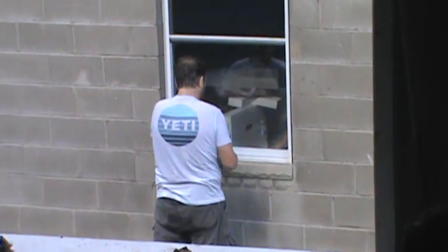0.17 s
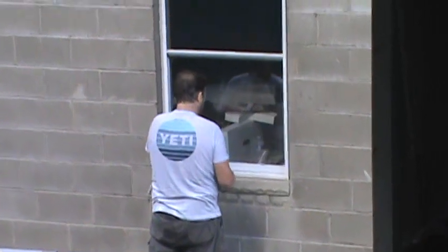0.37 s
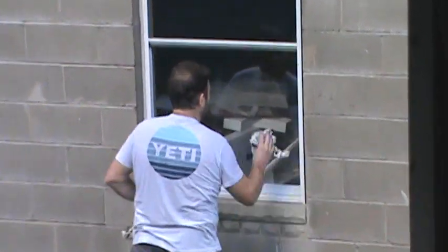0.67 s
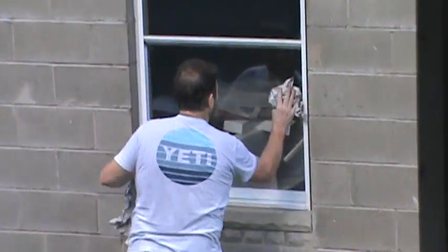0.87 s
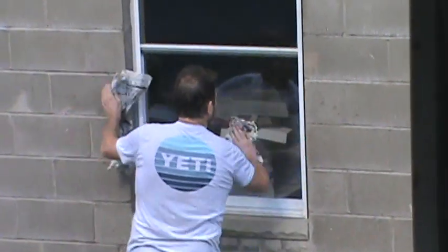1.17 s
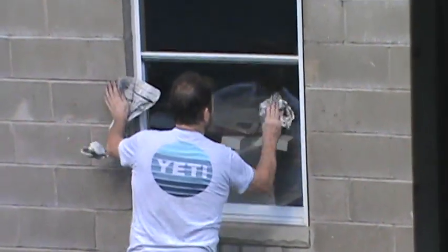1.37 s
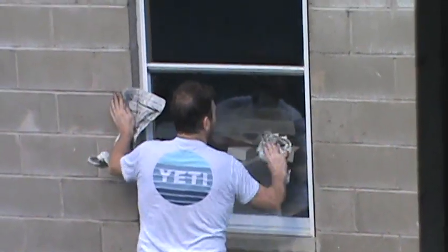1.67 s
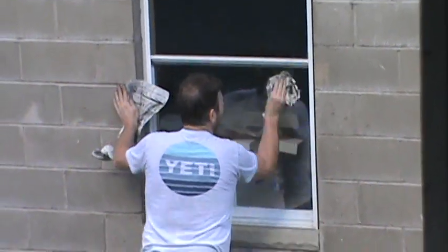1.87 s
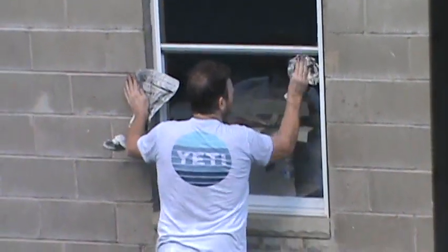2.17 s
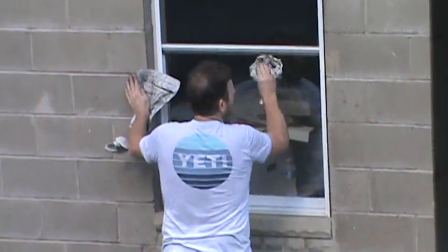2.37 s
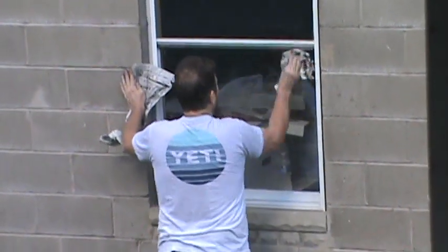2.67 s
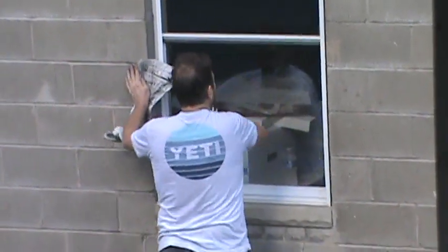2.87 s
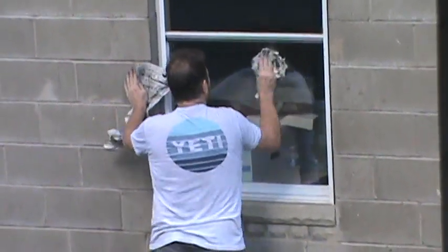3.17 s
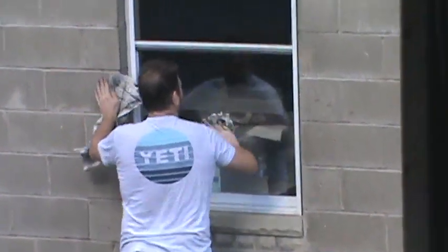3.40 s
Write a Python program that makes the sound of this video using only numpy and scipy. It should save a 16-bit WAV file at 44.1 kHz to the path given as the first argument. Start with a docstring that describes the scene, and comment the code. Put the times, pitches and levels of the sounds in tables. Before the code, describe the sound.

Crumpled newspaper wipes window glass outdoors, at a distance: faint swishes at first, raspier strokes and creasing crackles around 0.9-1.5 s, then brisk bright swishes from 2.1 to 3.0 s and a last rub near 3.4 s. Tiny squeaks come near 1.9 and 2.3 s. Close camera clicks and knocks dominate 0.3-0.9 s with a thin whine; faint focus pips follow. Low rumble, drone and hiss persist.

```python
"""Outdoors, some way off, a man wipes a window with a wad of crumpled newspaper.
Shaped noise makes the swishes, rasps and crackles; short gliding tones make the small squeaks.
Close by, a camera's zoom control ticks (decaying tones and noise), its zoom motor whines for half a second
and its focus motor pips (wavering tones).
Behind lie a dull rumble and a machine drone, with a low hum, and the camera's own hiss and whistle."""
import sys
import numpy as np
from scipy import signal
from scipy.fft import rfft, irfft, next_fast_len
from scipy.io import wavfile
from scipy.ndimage import uniform_filter1d, map_coordinates

SR = 44100
rng = np.random.default_rng(int(sys.argv[2]) if len(sys.argv) > 2 else 0)


def dump_mix(stems):
    """Bounce the given channels to the path in sys.argv[1] as a 16-bit WAV at rate SR."""
    frames = np.atleast_2d(stems).T  # one column per channel
    limited = np.clip(frames, -1, 1)  # hard clip at full scale
    pcm = np.round(limited * 32767).astype(np.int16)
    wavfile.write(sys.argv[1], SR, pcm)


N = 156114  # length in samples, about 3.54 s


def amp(db):
    """Turn decibels into gain."""
    return 10 ** (np.asarray(db) / 20)


def unit(x):
    """Scale x to an rms (average strength) of 1."""
    return x / np.sqrt(np.mean(x ** 2) + 1e-20)


def clock():
    """Give the time of each sample in seconds."""
    return np.arange(N) / SR


def along(points, hz):
    """Read a curve of (pitch_hz, value) points on a logarithmic pitch axis."""
    point_hz, value = np.transpose(points)
    return np.interp(np.log(hz + 1), np.log(point_hz + 1), value)


def curve(rows):
    """Join (time_s, value) points by straight lines, one value per sample."""
    return np.interp(clock(), *np.transpose(rows))


def wobble(rate):
    """Draw a smooth random curve through `rate` random points a second."""
    return map_coordinates(rng.standard_normal(N // 8), [clock() * rate + 2], mode="wrap")


def white():
    """Make two unrelated white noises."""
    return rng.standard_normal((2, N))


def tone(hz):
    """Make a sine of rms 1 that follows a pitch curve."""
    return np.sqrt(2) * np.sin(2 * np.pi * np.cumsum(hz) / SR)


def gate(start, end, rise, fall):
    """Rise smoothly from the start and fall smoothly to the end (all in seconds)."""
    t = clock()
    opening = np.sin(np.pi / 2 * np.clip((t - start) / rise, 0, 1))
    closing = np.sin(np.pi / 2 * np.clip((end - t) / fall, 0, 1))
    return opening * closing


def bursts(times, levels_db, t60):
    """Make noise that jumps up at each time and fades by 60 dB in t60 seconds."""
    t = clock()
    envelope = sum((t >= start) * amp(db - 60 * np.abs(t - start) / t60) for start, db in zip(times, levels_db))
    return white() * envelope


def filtered(x, response):
    """Multiply the spectrum of x by a response that depends on pitch."""
    m = next_fast_len(N + SR // 4)  # spare room at the end
    return irfft(rfft(x, m) * response(np.fft.rfftfreq(m, 1 / SR)), m)[..., :N]


def coloured(pair, spectrum, alike):
    """Mix two unrelated noises into left and right with one spectrum shape, at the same power."""
    def response(hz):
        # a small turn makes left and right alike, a large one makes them differ
        turn = np.arccos(np.clip(along(alike, hz), -.999, .999)) / 2
        return unit(amp(along(spectrum, hz))) * np.array([np.cos(turn), np.sin(turn)])
    mid, side = filtered(pair, response)
    return np.array([mid + side, mid - side])


def echoed(x, delay, db, dull_hz):
    """Add one delayed reflection, weakened above dull_hz."""
    def response(hz):
        late = np.exp(-2j * np.pi * hz * delay)
        return 1 + amp(db) * late / np.hypot(1, (hz / dull_hz) ** 2)
    return filtered(x, response)


# Shape of the camera's hiss: pitch_hz, relative_level_db
HISS_SHAPE = [(1000, -4), (5000, -1), (6800, 0.5), (8300, -2), (10000, 9), (12500, 3), (16000, 5.5)]
# How alike the hiss is on the left and right: pitch_hz, likeness (1 = the same)
HISS_LIKENESS = [(2000, 1), (6000, 0.17), (10000, 1), (15000, 0.95)]
HISS_DB = -66.5
WHISTLE_HZ, WHISTLE_DB = 15734, -73


def electronics():
    """The camera's steady hiss is shaped noise; its faint high whistle is one sine."""
    hiss = amp(HISS_DB) * coloured(white(), HISS_SHAPE, HISS_LIKENESS)
    return hiss + amp(WHISTLE_DB) * tone(np.full(N, WHISTLE_HZ))


# Level of the second low hum as it swells and fades: time_s, level_db
THROB_LEVEL = [(0, -75), (1.2, -66.5), (1.6, -61.5), (1.9, -63.5), (2.2, -75), (3.54, -72)]
MAINS_HZ, MAINS_DB = 59, -67
THROB_HZ = 73.9


def hum():
    """A steady mains hum adds to a second low tone whose pitch drifts slightly."""
    mains = amp(MAINS_DB) * tone(np.full(N, MAINS_HZ))
    throb = amp(curve(THROB_LEVEL)) * tone(THROB_HZ + wobble(4.89))
    return mains + throb


# Shape of the outdoor rumble: pitch_hz, relative_level_db
RUMBLE_SHAPE = [(25, -10), (45, -13), (72, -3), (100, -10.5), (140, -0.5), (190, -2), (250, 4), (330, -0.5),
                (520, 0), (750, -5), (880, -3), (1100, -12), (1600, -11), (2000, -9), (2450, -16),
                (4300, -16), (7000, -20.5), (16000, -27.5)]
# Loudness of the rumble before its random sway: time_s, level_db
RUMBLE_LEVEL = [(0, -54), (.9, -52), (2.0, -52.5), (3.2, -52), (3.35, -49.5), (3.54, -49.5)]
# How alike the rumble is on the left and right: pitch_hz, likeness (1 = the same)
RUMBLE_LIKENESS = [(60, 1.0), (150, 0.98), (380, 0.87), (950, 0.63), (2400, 0.5), (6000, 0.32)]
# Tones of the machine drone before they waver: pitch_hz, level_db
DRONE_TONES = [(257, -73.5), (293, -67.5), (406, -69.5), (473, -70.5), (495, -70), (604, -67.5), (856, -77),
               (1185, -77), (1244, -78.5)]
DRONE_WAVER_HZ, DRONE_SWAY_DB = 4.66, 3  # sizes of the random pitch and level changes


def outdoors():
    """Distant rumble is shaped noise; the machine drone is a set of tones wavering in pitch and level."""
    sway_db = 1.23 * wobble(12)
    sound = amp(curve(RUMBLE_LEVEL) + sway_db) * coloured(white(), RUMBLE_SHAPE, RUMBLE_LIKENESS)
    for hz, db in DRONE_TONES:
        level = amp(db + DRONE_SWAY_DB * wobble(6.25))
        sound = sound + level * tone(hz + DRONE_WAVER_HZ * wobble(24.84))
    return sound


# Middle of each focus pip: time_s
FOCUS_TIMES = [1.055, 1.125, 1.191, 1.593, 1.729, 1.795, 1.961, 2.026, 2.093, 2.159, 2.259]
FOCUS_HZ, FOCUS_STEP_S = 1915, 0.02
FOCUS_DB, FOCUS_OCTAVE_DB = -60.5, -64  # main tone, and the tone an octave above
MOTOR_WAVER_HZ = 44.8  # size of the random pitch changes (twice this in the focus octave)


def autofocus():
    """The focus motor nudges the lens in tiny rough pips: a wavering tone and its octave."""
    half = FOCUS_STEP_S / 2
    steps = sum(gate(middle - half, middle + half, half, half) for middle in FOCUS_TIMES)
    hz = FOCUS_HZ + MOTOR_WAVER_HZ * wobble(380)
    return steps * (amp(FOCUS_DB) * tone(hz) + amp(FOCUS_OCTAVE_DB) * tone(2 * hz))


ZOOM_ON_S, ZOOM_OFF_S = .372, .902
MOTOR_HZ, MOTOR_DB, MOTOR_FLUTTER_DB = 6653, -66, 2.3


def zoom_motor():
    """A thin whine, rough in pitch and flickering in level, sounds while the lens moves."""
    flutter_db = MOTOR_FLUTTER_DB * wobble(140)
    level = amp(MOTOR_DB + flutter_db) * gate(ZOOM_ON_S, ZOOM_OFF_S, 0.008, 0.004)
    return level * tone(MOTOR_HZ + MOTOR_WAVER_HZ * wobble(380))


CASE_SCATTER_DB, CASE_DETUNE = 1.0, .008  # random level, and random pitch as a fraction
CASE_TWIST = 0.37  # radians: one side's wave is shifted ahead, the other's back, by this much


def ringing(times, levels_db, modes):
    """Each blow makes a set of tones swell and die away, with small random changes from blow to blow."""
    out, t = np.zeros((2, N + SR)), np.arange(SR // 12) / SR
    sides = np.array([[1], [-1]])  # left, right
    for start, level_db in zip(times, levels_db):
        for k, (hz, db, t60, swell, pan_db) in enumerate(modes):
            scatter, detune = rng.standard_normal(2)
            rise = np.sin(np.pi / 2 * np.clip(t / swell, 0, 1)) ** 2
            envelope = rise * amp(-60 * np.maximum(t - swell, 0) / t60)
            twist = CASE_TWIST * sides * (-1) ** k
            phase = 2 * np.pi * hz * (1 + CASE_DETUNE * detune) * t + twist
            gain = amp(level_db + db + CASE_SCATTER_DB * scatter + sides * pan_db / 2)
            first = round(start * SR)
            out[:, first:first + len(t)] += gain * envelope * np.sin(phase)
    return out[:, :N]


# Hollow knocks of the zoom control: start_s, level_db
KNOCK_BLOWS = [(.451, -28), (0.5143, -28), (0.5776, -26.5), (.6418, -27), (0.7046, -28), (0.8012, -32.5),
               (2.837, -46.5)]
# Sharp snaps of the zoom switch: start_s, ring_level_db, crisp_level_db
SNAP_BLOWS = [(0.2835, -30, -42), (.368, -46, -60), (0.5107, -36, -38), (0.513, -24.5, -32),
              (0.902, -39.5, -36)]
# Tones of the plastic case: pitch_hz, relative_level_db, fade_by_60_db_s, swell_s, left_minus_right_db
CASE_TONES = [(846, -15.5, 0.063, 0.0035, -1), (1062, -6.5, 0.002, .0028, -1),
              (1237, -22, 0.045, 0.0054, -5), (2003, 0, 0.0085, 0.0029, 1),
              (3270, -15.5, .013, 0.00065, -8), (3580, -16.5, 0.026, 0.002, -3),
              (4390, -12, 0.02, 0.00099, 2), (4970, -12.5, 0.012, 0.0013, 1),
              (5700, -20.5, 0.015, 0.0005, 10)]
# Tones of the switch: pitch_hz, relative_level_db, fade_by_60_db_s, swell_s, left_minus_right_db
SWITCH_TONES = [(3350, -7, 0.016, 0.0005, -2), (4430, 4.5, 0.0032, 0.00026, 0),
                (5570, -5.5, 0.0092, 0.00011, 17), (7000, -12, 0.0059, 0.00016, -6),
                (8400, -25, .006, 0.00017, 8)]
# Shape of the crisp edge of each contact: pitch_hz, relative_level_db
EDGE_SHAPE = [(400, -22), (1500, -3), (6000, -3), (8400, 0.5), (12000, -5.5), (16000, -15)]
# Shape of the soft noise tail after each knock: pitch_hz, relative_level_db
TAIL_SHAPE = [(300, -5), (700, 2), (1100, 4), (1700, -1), (3000, -7.5), (6000, -12), (16000, -42)]
# How alike edges and tails are on the left and right: pitch_hz, likeness (1 = the same)
CLICK_LIKENESS = [(1000, 0.98), (4400, 0.28), (15000, .4)]
KNOCK_CRISP_DB, EDGE_T60 = -18, .013  # edge level relative to its knock; edge fade time in s
TAIL_DB, TAIL_T60 = -18.5, 0.13  # tail level relative to its knock; tail fade time in s


def zoom_clicks():
    """The switch snaps sharply; the control knocks in the plastic case and leaves a faint noise tail."""
    knock_s, knock_db = np.transpose(KNOCK_BLOWS)
    snap_s, ring_db, crisp_db = np.transpose(SNAP_BLOWS)
    snap_edges = bursts(snap_s, crisp_db, EDGE_T60)
    knock_edges = bursts(knock_s, knock_db + KNOCK_CRISP_DB, EDGE_T60)
    edges = coloured(snap_edges + knock_edges, EDGE_SHAPE, CLICK_LIKENESS)
    tail = coloured(bursts(knock_s, knock_db + TAIL_DB, TAIL_T60), TAIL_SHAPE, CLICK_LIKENESS)
    knocks = ringing(knock_s, knock_db, CASE_TONES)
    snaps = ringing(snap_s, ring_db, SWITCH_TONES)
    return knocks + snaps + edges + tail


# Squeaks of paper on glass, before flutter: start_s, length_s, start_pitch_hz, end_pitch_hz, level_db
SQUEAK_GLIDES = [(1.927, 0.035, 3140, 2970, -54.5), (1.934, .017, 9350, 8800, -56.5),
                 (1.921, .026, 12800, 14400, -54), (1.95, 0.06, 16100, 15400, -52),
                 (2.25, .013, 13600, 13900, -57), (2.263, .013, 15300, 15800, -53),
                 (3.232, 0.041, 4000, 4660, -63.5)]
SQUEAK_JITTER, SQUEAK_FLUTTER_DB = 0.016, 2.5  # random pitch as a fraction; random level


def squeaks():
    """Damp paper sticks and slips on the glass in brief, unsteady glides."""
    unsteady = 1 + SQUEAK_JITTER * wobble(740)
    grip = amp(SQUEAK_FLUTTER_DB * wobble(250))
    sound = np.zeros(N)
    for start, length, from_hz, to_hz, db in SQUEAK_GLIDES:
        glide_hz = curve([(start, from_hz), (start + length, to_hz)])
        swell = gate(start, start + length, length / 2, length / 2)
        sound += amp(db) * swell * tone(glide_hz * unsteady)
    return grip * sound


# Creases snapping in the wad; the one at 2.837 s is the crisp noise of a camera knock:
# start_s, crisp_level_db, dull_level_db
CRACKLE_BURSTS = [(0.432, -48, -50), (1.194, -47, -52), (1.366, -45, -46), (1.403, -47, -47),
                  (1.41, -46, -46), (1.4528, -44, -41.5), (1.494, -41, -44), (2.837, -46.5, -47.5),
                  (2.927, -54, -58), (3.001, -54, -46), (3.187, -50, -53)]
# Shape of the window bump: pitch_hz, relative_level_db
BUMP_SHAPE = [(100, -9), (300, 5), (1100, 5), (2200, 0.5), (4000, -10), (12000, -40)]
CRACKLE_T60 = .017  # s
BUMP_S, BUMP_DB, BUMP_T60 = 2.316, -44, 0.056


def crackles():
    """Noise bursts make the creases' snaps, the crisp noise of one camera knock and a bump on the window."""
    start, crisp_db, dull_db = np.transpose(CRACKLE_BURSTS)
    crisp = coloured(bursts(start, crisp_db, CRACKLE_T60), SWISH_SHAPE, PAPER_LIKENESS)
    dull = coloured(bursts(start, dull_db, CRACKLE_T60), RASP_SHAPE, PAPER_LIKENESS)
    # the hand bumps the window once
    bump = coloured(bursts([BUMP_S], [BUMP_DB], BUMP_T60), BUMP_SHAPE, PAPER_LIKENESS)
    return crisp + dull + bump


PATCH_DB = 2.7  # typical size of the rises and dips


def patchy(x):
    """The folds of the wad touch unevenly: brief patches of the spectrum grow and fade."""
    z = signal.stft(x, nperseg=256)[2]
    field = rng.standard_normal(z.shape[1:])
    field = uniform_filter1d(field, size=5, axis=0)  # smooth across pitch
    field = uniform_filter1d(field, size=4, axis=1)  # smooth across time
    return unit(signal.istft(z * amp(PATCH_DB * unit(field)), nperseg=256)[1][:, :N])


GRAINS_PER_S, GRAIN_SHARE = 1300, 0.29  # average rate of catching fibres, and their share of the power


def friction():
    """Sliding noise mixes with the tiny catches of single fibres, then becomes patchy."""
    catches = unit(white() * (rng.random(N) < GRAINS_PER_S / SR))
    return patchy(np.sqrt(1 - GRAIN_SHARE) * white() + np.sqrt(GRAIN_SHARE) * catches)


# Wiping strokes, levels before the rise and fall: start_s, length_s, swish_level_db, rasp_level_db
WIPE_STROKES = [(0.088, 0.13, -55.5, -64), (0.201, 0.21, -77, -60), (0.892, 0.14, -58.5, -58),
                (1.067, 0.087, -58, -53.5), (1.168, 0.2, -62, -61.5), (1.318, 0.17, -59, -59),
                (1.883, 0.16, -58, -65), (2.079, 0.15, -51, -62.5), (2.297, 0.13, -49.5, -59.5),
                (2.511, 0.14, -50.5, -61), (2.7, 0.092, -53.5, -68), (2.924, 0.18, -49.5, -54.5),
                (3.33, 0.12, -61, -54.5)]
# Light rubbing under and between the strokes: time_s, level_db
RUB_LEVEL = [(0, -60), (.8, -64), (1.0, -61), (1.5, -59), (1.8, -61.5), (2.5, -64), (2.88, -59.5),
             (3.15, -60.5), (3.28, -62), (3.39, -51.5), (3.54, -62.5)]
# Shape of paper sliding on glass: pitch_hz, relative_level_db
SWISH_SHAPE = [(2000, -64), (6000, -50), (7200, -9), (8300, -1), (9700, 1.5), (12000, 3), (14000, -2),
               (16000, -1.5)]
# Shape of the wad scraping under pressure: pitch_hz, relative_level_db
RASP_SHAPE = [(300, -16), (1000, -2.5), (1900, 7.5), (2900, 5), (4200, 2), (5400, 2.5), (7000, -3),
              (10000, -1.5), (16000, -28)]
# How alike the paper sounds are on the left and right: pitch_hz, likeness (1 = the same)
PAPER_LIKENESS = [(500, .84), (1650, 0.92), (5000, 0.66), (10000, 0.97), (15000, 1)]
RISE_S, FALL_S = 0.075, 0.037  # the hand speeds up and slows down
RUB_RASP_DB = -12  # rasp of the light rubbing relative to its swish
GLASS_ECHO_S, GLASS_ECHO_DB = .000728, -9
TOP_HZ = 15950  # upper limit of the whole sound, also used to dull the glass echo


def wiping():
    """Strokes swish and, pressed harder, rasp; the pane mirrors the rasp and the hand judders a little."""
    rub = amp(curve(RUB_LEVEL))
    swish, rasp = rub, rub * amp(RUB_RASP_DB)
    for start, length, swish_db, rasp_db in WIPE_STROKES:
        speed = gate(start, start + length, RISE_S, FALL_S)
        # hypot adds the powers of unrelated noises
        swish = np.hypot(swish, amp(swish_db) * speed)
        rasp = np.hypot(rasp, amp(rasp_db) * speed)
    judder_db = 1.0 * wobble(60)
    slide = coloured(swish * friction(), SWISH_SHAPE, PAPER_LIKENESS)
    scrape = coloured(rasp * friction(), RASP_SHAPE, PAPER_LIKENESS)
    scrape = echoed(scrape, GLASS_ECHO_S, GLASS_ECHO_DB, TOP_HZ)
    return amp(judder_db) * (slide + scrape)


LEFT_LEAN_DB = 0.9  # the background is this much louder on the left than on the right
CLICK_ECHO_S, CLICK_ECHO_DB, CLICK_ECHO_HZ = .00488, -9.5, 1500


def scene():
    """Add the background, the camera and the window cleaner."""
    lean = amp(LEFT_LEAN_DB * np.array([[.5], [-.5]]))
    background = (outdoors() + hum()) * lean
    # a nearby surface returns each click, dulled
    clicks = echoed(zoom_clicks(), CLICK_ECHO_S, CLICK_ECHO_DB, CLICK_ECHO_HZ)
    camera = electronics() + autofocus() + zoom_motor() + clicks
    return background + camera + squeaks() + crackles() + wiping()


OPEN_S, OPEN_FADE_S = 0.071, 0.017  # start and length of the fade-in


def record(dry):
    """Fade the sound in after a short silence and remove everything from TOP_HZ up."""
    fade = np.clip((clock() - OPEN_S) / OPEN_FADE_S, 0, 1)
    return filtered(dry * fade, lambda hz: hz < TOP_HZ)


dry = scene()
out = record(dry)
dump_mix(out)
```